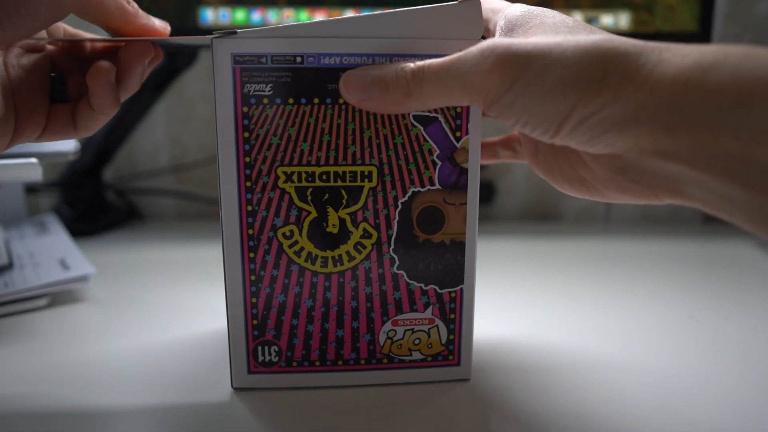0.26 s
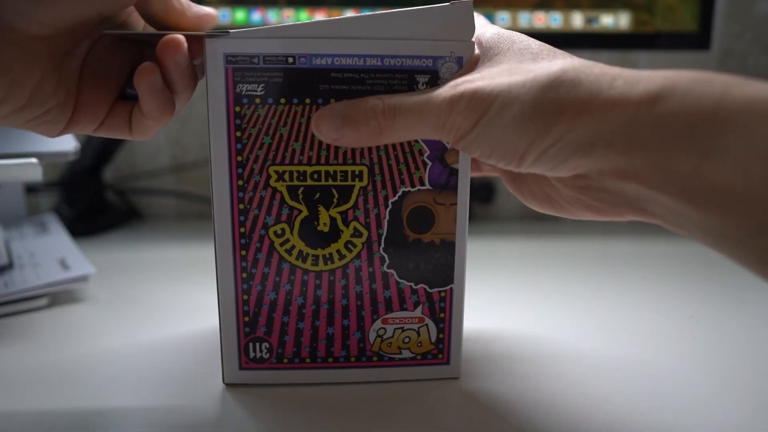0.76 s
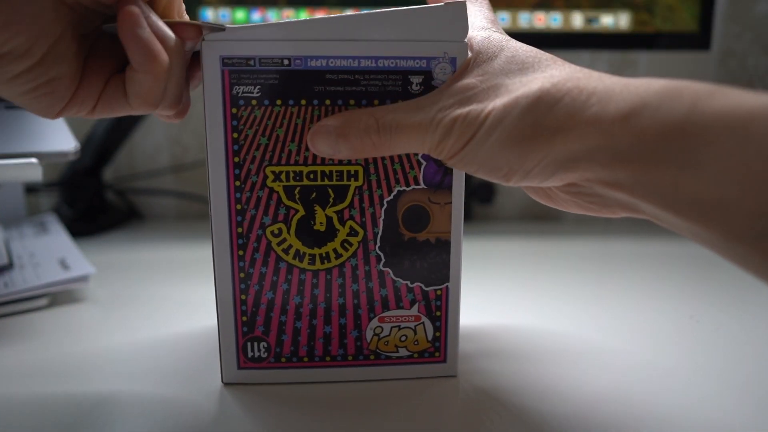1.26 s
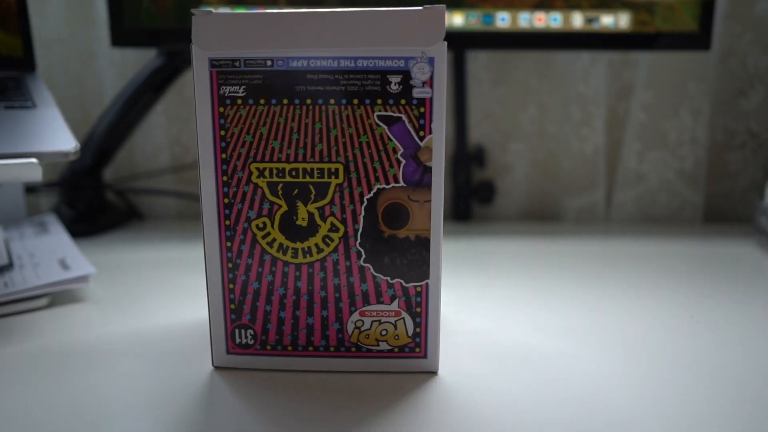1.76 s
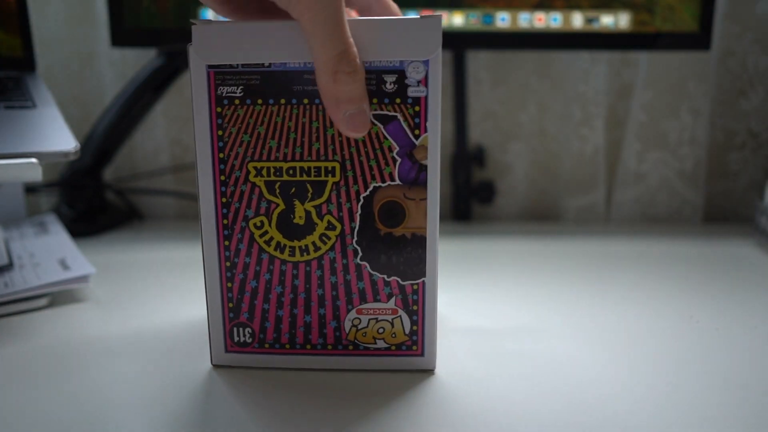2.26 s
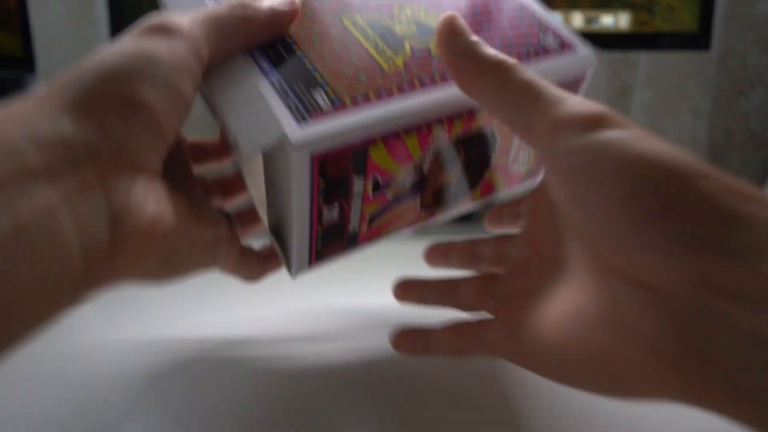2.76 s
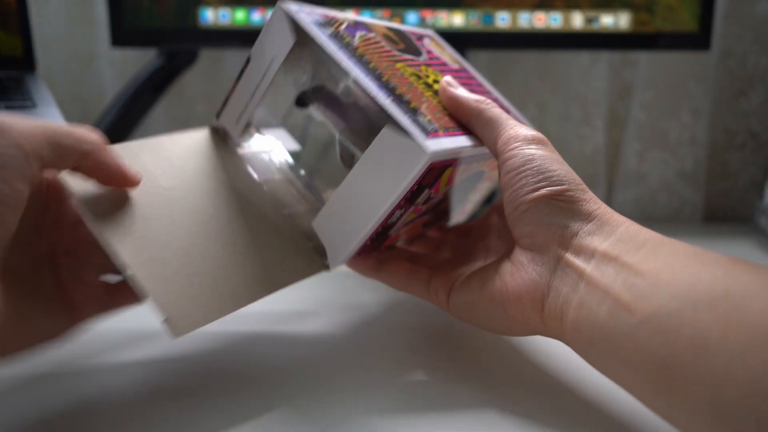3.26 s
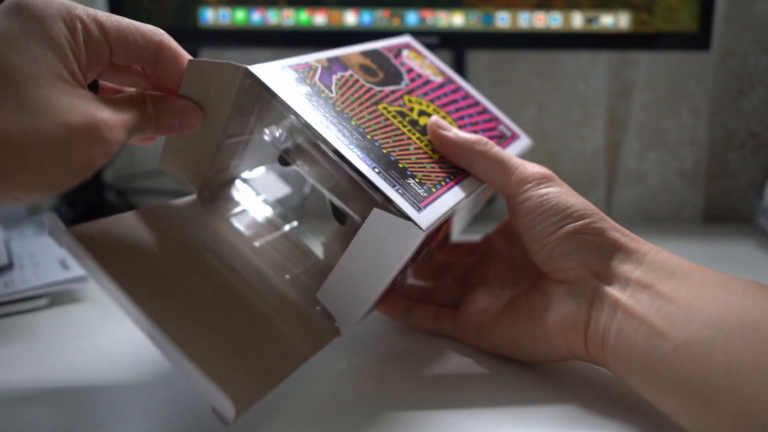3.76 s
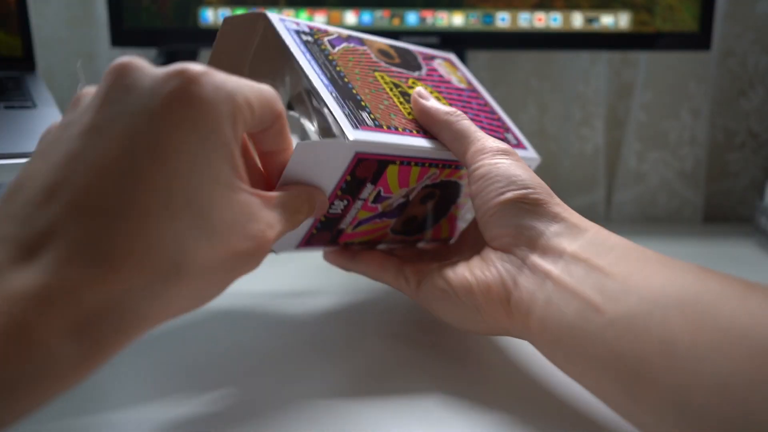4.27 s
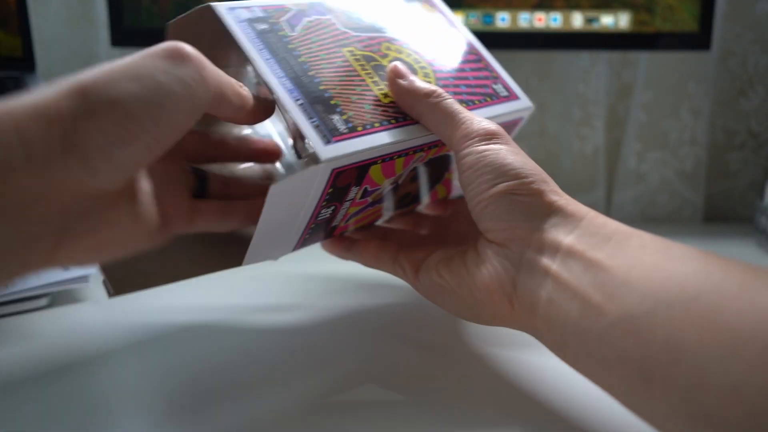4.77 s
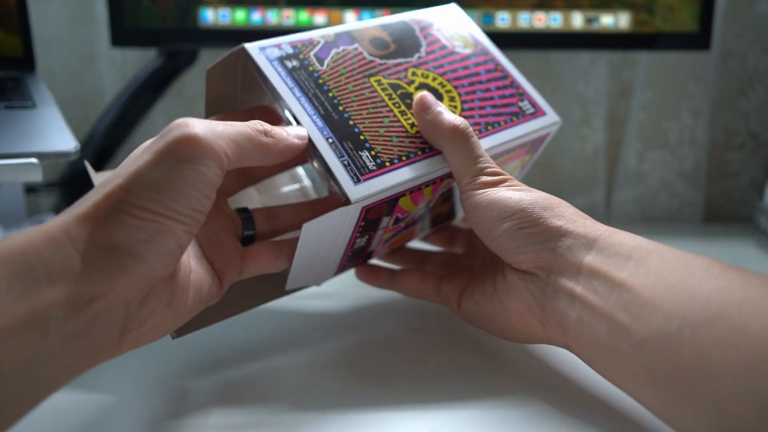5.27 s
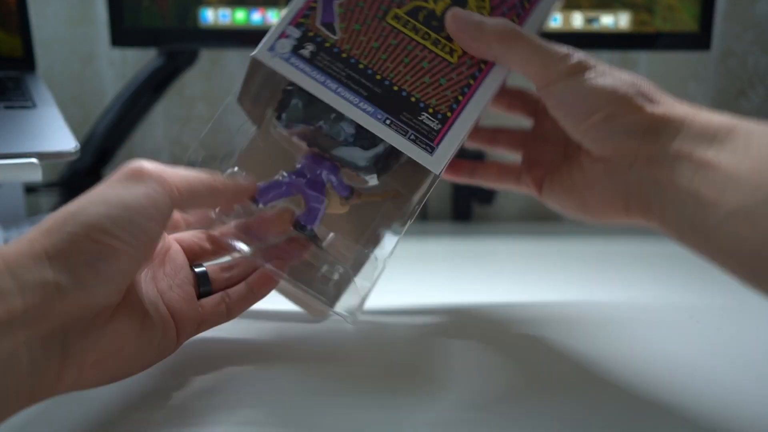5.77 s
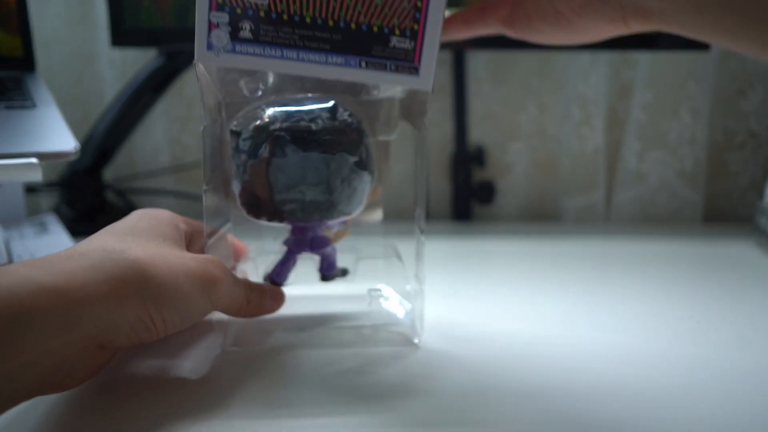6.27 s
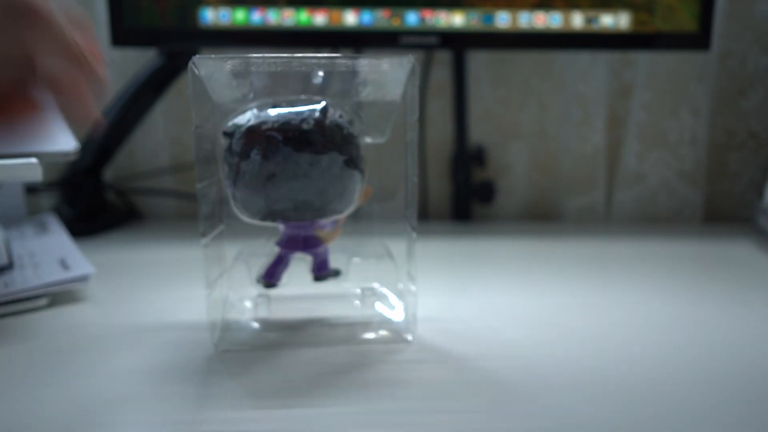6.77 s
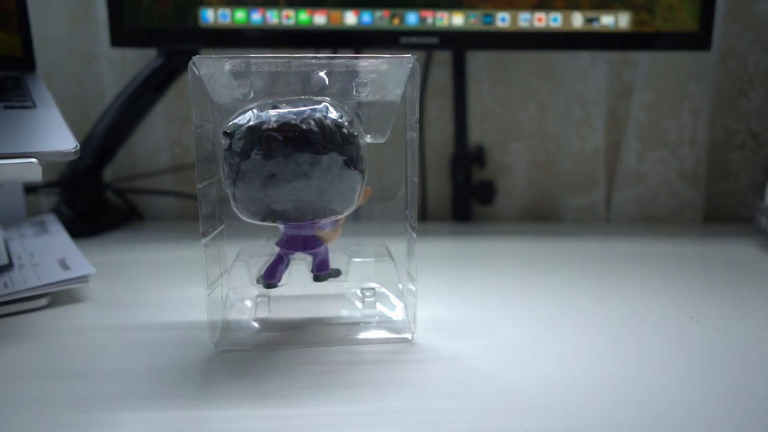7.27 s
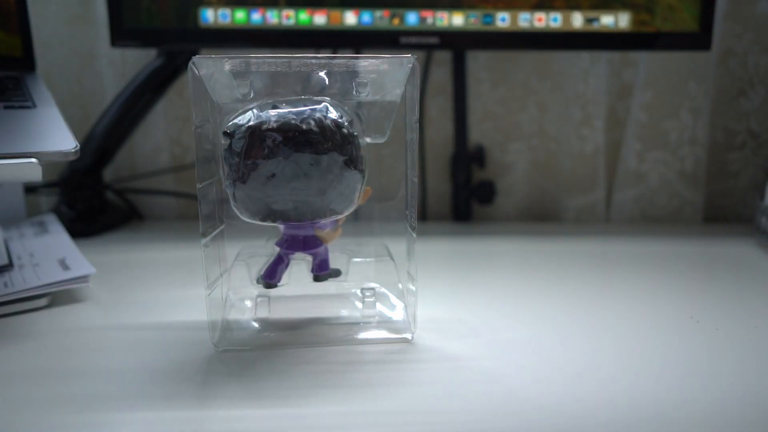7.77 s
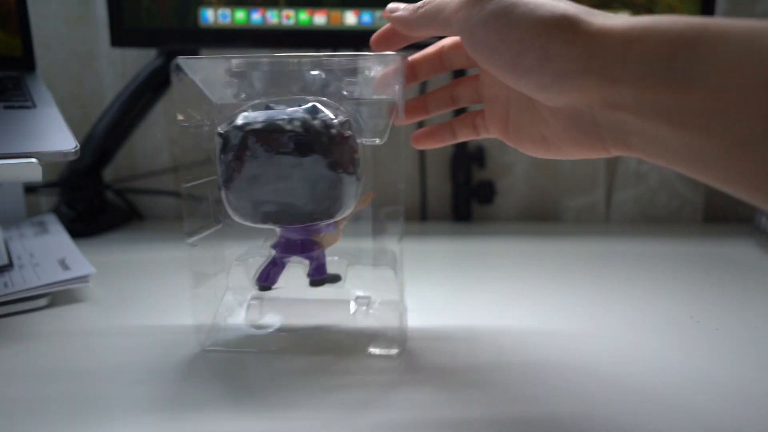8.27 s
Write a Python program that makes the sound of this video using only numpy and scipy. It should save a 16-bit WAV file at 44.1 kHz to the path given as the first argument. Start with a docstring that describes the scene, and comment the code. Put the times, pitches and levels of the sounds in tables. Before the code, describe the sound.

Close, fairly dry sound in a small room with faint low air, weighted to the left. From 0 to 1.3 s a standing cardboard box gets light hollow knocks with small ticks and faint rubbing, firmest near 0.8. At 1.3 the lid flap pops in a quick broad burst, with a short rub and a desk bump. From 1.8 to 5 s card is softly rubbed and folded, with dull buckling snaps, sharp flicks and crinkles, busier after 4.8. At 5.2 a rapid run of ticks starts the plastic insert moving; it scrapes out in uneven tugs until 6.5, with strong clicks near 5.3, 5.6 and 6.3. Soft bumps and a low rumble follow at 6.7, then delicate plastic rocking taps from 7.0 to 7.45. After a quiet pause, the empty box lands with a loud hollow knock at 7.9, a lesser one at 8.07, and the insert slides grainily to 8.5.

```python
"""Close microphone at a desk in a small room: a cardboard toy box stands there and is knocked, and a blade
pries at the lid until its flap pops open. Hands lift the box and fold back crinkling flaps that snap.
A thin plastic insert creeps in a run of ticks, scrapes out along the card in tugs, then rocks and taps.
The empty box is put down with a knock and the insert is slid over the desk.
Blows are struck modes with noisy cracks; rubbing is grainy noise shaped by card, plastic and desk."""
import sys
import numpy as np
from scipy import signal
from scipy.fft import rfft, irfft, next_fast_len
from scipy.io import wavfile
from scipy.ndimage import uniform_filter1d

SR = 44100
rng = np.random.default_rng(int(sys.argv[2]) if len(sys.argv) > 2 else 0)


def wrap_up_sound(samples):
    """Save the sound to the file named by the first command line argument, as 16-bit audio."""
    columns = np.atleast_2d(samples).T
    # keep every value between -1 and 1, then stretch to whole-number steps
    tamed = np.clip(columns, -1, 1)
    steps = np.round(tamed * 32767).astype(np.int16)
    wavfile.write(sys.argv[1], SR, steps)


N = 375291
TIME = np.arange(N) / SR       # s, whole scene
AGE = TIME[:SR // 3]           # s, since a blow

# Event levels are relative: each source's own trims, the room and the channel balance come on top.
# Bumps that reach the desk top: t/s, level/dB, tilt towards higher modes/(dB per octave)
DESK_BUMPS = [(1.318, -34, 6), (1.455, -25.5, 13), (1.848, -33, 2), (2.904, -31.5, -8), (3.053, -28, -10),
              (3.761, -33.5, 7), (4.699, -33.5, -4.5), (5.347, -27.5, 0), (6.656, -36, 3), (6.753, -27, -6),
              (7.121, -24, 0), (7.903, -17, 5), (8.069, -24, -3.5)]
# Desk rumble while things are put down: t/s, length/s, level/dB
DESK_RUMBLES = [(6.662, 0.14, -33.5), (6.853, 0.32, -48.5), (7.167, 0.39, -41.5)]
# Blows on the standing box: t/s, hollow body level/dB, hardness = tick over body/dB
BOX_KNOCKS = [(0.0603, -40.5, -7.5), (0.3442, -24, -12), (0.4879, -31.5, -38), (0.5287, -34.5, -12),
              (0.6695, -31.5, -18), (0.678, -26, -8.5), (0.778, -19.5, -14.5), (1.1127, -37, -13.5),
              (1.2821, -32, -21), (7.899, -12.5, -16), (8.0665, -25, -16)]
# Tuck flap springing free in quick jerks: t/s, level/dB
FLAP_JERKS = [(1.3142, -10), (1.3182, -10.5), (1.3247, -22)]
# Panel buckling under the fingers, a dull snap: t/s, panel level/dB, hardness = crack over panel/dB
PANEL_SNAPS = [(1.408, -34.5, 10), (1.4273, -34.5, 4), (1.603, -49, -0.5), (2.1911, -42.5, 14),
               (2.9015, -25.5, -15), (3.5614, -31.5, -9.5), (3.7004, -34, -0.5), (3.76, -40, 2),
               (3.85, -31, -16), (3.8676, -34, -25), (3.9328, -34, -10.5), (4.2744, -36, -4.5),
               (4.8229, -23, -3.5), (5.01, -25, -3), (5.1971, -21, -6.5), (5.2343, -16.5, -6),
               (6.2755, -14.5, -4), (6.3664, -25.5, -2), (6.6033, -46, 13.5), (6.6638, -30.5, 9),
               (6.784, -36, 3.5)]
# Edge catching and flicking free, a sharp click: t/s, panel level/dB, hardness = crack over panel/dB
EDGE_FLICKS = [(0.8921, -57, 15.5), (2.2653, -35, 0.5), (2.3384, -31, 5), (2.923, -39.5, 5),
               (3.0848, -36, 9), (3.1622, -30.5, -5.5), (4.114, -32.5, -3), (4.584, -42.5, -5.5),
               (4.807, -29.5, -4), (4.8174, -24.5, -5.5), (4.9653, -45.5, 9.5), (5.0544, -32.5, -1),
               (5.1466, -28.5, -9.5), (5.3426, -17.5, -25), (5.6326, -18.5, 1.5), (5.9608, -20.5, -1.5),
               (6.0133, -23.5, 0.5), (6.497, -23, 2.5), (6.7514, -40, 8.5), (6.7584, -31.5, 1)]
# Freed insert rocking on the desk: t/s, crack level/dB, ring level/dB
INSERT_TAPS = [(7.0117, -56, -41.5), (7.0624, -47, -36), (7.1186, -43.5, -37.5), (7.1787, -49, -41),
               (7.215, -31, -33), (7.2824, -43, -43), (7.3841, -45.5, -43.5), (7.443, -46, -41.5)]
# Quick slips that make the plastic shell sing: t/s, length/s, level/dB, treble tilt/(dB per octave)
SHELL_SLIPS = [(1.335, 0.036, -32.5, -15), (4.693, 0.024, -45.5, -1.5), (4.742, 0.023, -47.5, -0.5),
               (5.704, 0.015, -37.5, -24), (5.853, 0.04, -34.5, 4.5), (6.291, 0.079, -30.5, -3),
               (7.363, 0.018, -52.5, 3.5)]
# Blade, fingers and flaps rubbing on card: t/s, length/s, level/dB, brightness/dB
CARD_STROKES = [(0.53, 0.21, -49.5, 4), (0.862, 0.1, -54, -3), (1.31, 0.048, -25.5, 5.5),
                (1.43, 0.11, -39, 0.5), (1.82, 0.054, -53.5, 10), (1.954, 0.076, -64.5, 11),
                (2.192, 0.19, -46, 10.5), (2.476, 0.028, -45.5, -9.5), (2.556, 0.19, -46.5, -6),
                (2.79, 0.22, -42, 1), (3.03, 0.14, -40.5, -4.5), (3.223, 0.068, -40, 4.5),
                (3.537, 0.062, -45.5, -6), (3.652, 0.11, -45.5, 4), (3.82, 0.077, -45.5, 2),
                (4.1, 0.053, -44, -3.5), (4.17, 0.22, -53.5, -1.5), (4.444, 0.036, -64.5, 13.5),
                (4.792, 0.067, -34.5, -4), (4.85, 0.31, -48, -1.5), (6.52, 0.085, -36, -16),
                (6.65, 0.038, -28.5, -11), (6.76, 0.049, -35.5, -18)]
# Insert tugged out of the box: t/s, length/s, level/dB, brightness/dB
INSERT_TUGS = [(5.27, 0.078, -38.5, 0), (5.345, 0.11, -28.5, 6), (5.455, 0.21, -33.5, 1.5),
               (5.685, 0.088, -32, 5.5), (5.78, 0.17, -39, -8), (5.838, 0.02, -35.5, 10),
               (5.96, 0.232, -36, -4.5), (6.19, 0.16, -31.5, -3), (6.375, 0.15, -32, -1.5)]
# Insert pushed over the desk: t/s, length/s, level/dB, brightness/dB
DESK_PUSHES = [(8.035, 0.093, -41, -5.5), (8.13, 0.054, -45, -2.5), (8.23, 0.263, -38, 2.5)]

# Struck modes of the box on the desk, a loose panel, the desk top and the standing insert:
# f/Hz, level/dB, t60/s
BOX_RINGING = [(144, -12.5, 0.11), (201.2, -13.5, 0.099), (254, -11, .09), (292, -9.5, 0.08),
               (378, -11.5, 0.1), (478, 1.5, 0.067), (558.3, -1, 0.071), (680, -9.5, 0.031),
               (1040, -14.5, 0.02), (1390, -8, 0.023)]
PANEL_RINGING = [(273, -9, 0.067), (427, -3, 0.068), (581, 1, 0.084), (682, 1.5, 0.11), (840, -8.5, 0.019),
                 (1026, 0.5, 0.12), (1210, -2.5, 0.075)]
DESK_RINGING = [(64.6, -2.5, 0.48), (81.4, 1.5, 0.24), (123, 8, 0.15), (152, -6.5, 0.11),
                (182, -0.5, 0.086)]
INSERT_RINGING = [(684, 6.5, 0.042), (774, -3, 0.062), (1063, -8, 0.05), (1810, -3, 0.014)]
# Resonances of the plastic shell and of the insert's creeping rim: f/Hz, width/Hz, level/dB
SHELL_PEAKS = [(1060, 140, -2.5), (2240, 91, -14), (3420, 780, -8), (3820, 270, -5.5)]
RIM_PEAKS = [(7100, 500, -3), (8220, 700, 7), (9940, 820, 6)]

# Spectra of rubbed card, plastic along card, insert over desk, flap burst, low thumps and room air:
# f/Hz, level per Hz/dB
CARD_SPECTRUM = [(35, -23), (60, 5), (94, 1.5), (323, -10), (566, -3), (1860, -16.5), (3760, -19),
                 (5460, -40), (11000, -41.5), (16000, -54)]
PLASTIC_SPECTRUM = [(35, -18.5), (60, 1), (323, -8), (553, -4.5), (903, -11.5), (1010, -5), (1910, -13.5),
                    (3580, -11.5), (4750, -18), (16000, -26)]
DESK_SPECTRUM = [(59, -50), (100, -12), (156, -22), (215, -5.5), (513, -12), (662, 1), (950, -5.5),
                 (1080, -6), (3470, -13.5), (16000, -24)]
FLAP_SPECTRUM = [(50, -14), (150, -10.5), (310, -1.5), (560, -1), (800, -8.5), (1500, -8), (1900, -19.5),
                 (2500, -6), (3800, -10.5), (5800, -23), (9800, -24.5), (16000, -36.5)]
LOW_SPECTRUM = [(35, -13), (70, 1.5), (100, -1), (140, -6), (210, -10.5), (350, -12.5), (900, -58)]
AIR_SPECTRUM = [(25, -30.5), (42, 8), (139, -6.5), (258, 0), (435, -7), (544, -7), (1840, -23), (3880, -26),
                (5230, -37.5), (14800, -43.5), (16000, -48)]
# Bands of panel, rasp and edge sparkle: lower f/Hz, upper f/Hz
ZONES = [(50, 1400), (1400, 4600), (4600, 17000)]

ROOM_T60_S, ROOM_DB = 0.27, -10   # decay; tail against direct sound
LEFT_OVER_RIGHT_DB = 9.0
CRINKLES_PER_S, CRINKLE_DB, CRINKLE_SPREAD_DB = 36, -3.5, 2.5   # mean rate, level against rubbing, sizes
RIM_DAMPING_DB = 13               # once the insert slides, the card damps its rim


def from_db(db):
    """Decibels to gain."""
    return 10 ** (np.asarray(db) / 20)


def rms_one(x):
    """Scale to rms 1."""
    return x / np.sqrt(np.mean(x ** 2) + 1e-20)


def crest_one(x, size=176):
    """Scale so that the loudest few milliseconds have rms 1."""
    power = uniform_filter1d(x ** 2, size, mode="constant")
    return x / np.sqrt(power.max() + 1e-20)


def band(x, edges_hz, order=3):
    """Causal band-pass."""
    sos = signal.butter(order, edges_hz, "band", fs=SR, output="sos")
    return signal.sosfilt(sos, x + 1e-18)


def colour(x, spectrum, peaks=()):
    """Shape noise by a spectrum, with resonances standing out of it."""
    size = next_fast_len(len(x))
    hz = np.arange(size // 2 + 1) * SR / size + 1e-3
    points, db = np.transpose(spectrum)
    lift = 1 + sum(from_db(d) / (1 + (2 * (hz - f) / width) ** 2) for f, width, d in peaks)
    shape = from_db(np.interp(np.log(hz), np.log(points), db))
    return irfft(rfft(x, size) * lift * shape, size)[:len(x)]


def drift(per_s):
    """Random wander with rms 1: straight lines between chance values."""
    knots = rng.standard_normal(4000)
    return rms_one(np.interp(TIME * per_s, np.arange(len(knots)), knots))


def add(track, s, sound):
    """Mix a sound in at a time."""
    start = int(round(s * SR))
    track[start:start + len(sound)] += sound[:N - start]


def dying(t60):
    """Exponential decay by 60 dB in t60 seconds."""
    return from_db(-60 * AGE / t60)


def swell(length, rise_s, fall_s, grow_db=0):
    """One stroke takes hold, lasts while the hand gathers speed, and lets go."""
    age = TIME[:SR]
    speed = from_db(grow_db * (np.minimum(age / length, 1) - 0.5))
    hold = np.clip(age / rise_s, 0, 1)
    release = np.exp(-np.maximum(age - length, 0) / fall_s)
    return speed * hold * release


def shifting(x, gap_s, share, wander, per_s=11):
    """Sound bounces between walls whose gap keeps changing, so its resonances wander."""
    out = x
    round_trip = gap_s * np.exp(wander * drift(per_s))
    for trips in (1, 2, 3):
        source = np.round((TIME - trips * round_trip) * SR).astype(int)
        out = out + (-share) ** trips * x[np.clip(source, 0, N - 1)]
    return out / np.sqrt(1 + share ** 2 + share ** 4)


def ring(modes, scatter_db, detune):
    """Struck modes; strength and pitch depend on where the thing is hit and held."""
    out = 0
    for hz, db, t60 in modes:
        strength, shift, sign = rng.standard_normal(3)
        gain = np.sign(sign) * from_db(db + scatter_db * strength)
        tone = np.sin(2 * np.pi * hz * (1 + detune * shift) * AGE)
        out = out + gain * dying(t60) * tone
    return out


def thud(modes, t60, share_db, detune):
    """A blow to a panel: a few clear modes among many damped ones."""
    clear = crest_one(ring(modes, scatter_db=-1.0, detune=detune))
    strike = rng.standard_normal(len(AGE)) * dying(t60) + 6 * (AGE == 0)
    damped = band(strike, [130, 1100], order=2)
    return crest_one(clear + from_db(share_db) * crest_one(damped))


def crack(t60, spike, fold_db=6, rise_s=0.0012):
    """A sharp release with the crowded high modes of a thin sheet; each fold has its own resonances."""
    folds = [(hz, hz / 7, fold_db) for hz in 1600 * 2 ** rng.uniform(0, 2.99, size=3)]
    spectrum = [(1400, 15), (10000, 4), (16000, -5.0)]
    sheet = rms_one(colour(rng.standard_normal(len(AGE)), spectrum, folds)) * dying(t60)
    release = spike * (np.arange(len(AGE)) == int(rise_s * SR))
    return sheet * np.clip(AGE / rise_s, 0, 1) + release


def split_crack(tick, edge_db, order=3):
    """A crack's rasp band at unit level with its share of top-end sparkle."""
    rasp = crest_one(band(tick, ZONES[1], order=order))
    return rasp + from_db(edge_db) * crest_one(band(tick, ZONES[2]))


def room_air():
    """Steady, mostly low background noise of the room."""
    return from_db(-56) * rms_one(colour(rng.standard_normal(N), AIR_SPECTRUM))


def room(x, first_echo_s=0.0068, wall_hz=6500):
    """A dense, slightly dull tail from the nearby walls."""
    noise = band(rng.standard_normal(len(AGE)), [120, min(wall_hz, 18000)], order=1)
    tail = noise * dying(ROOM_T60_S) * (AGE > first_echo_s)
    tail = tail / np.sqrt(np.sum(tail ** 2) * SR / (2 * wall_hz))
    return x + from_db(ROOM_DB) * signal.fftconvolve(x, tail)[:N]


def desk(bump_db=-3, rumble_db=0):
    """The desk top booms in its modes under bumps and rumbles around its two lowest ones."""
    shaking = np.zeros(N)
    for s, length, db in DESK_RUMBLES:
        add(shaking, s, from_db(db + rumble_db) * swell(length, rise_s=0.044, fall_s=0.047))
    low_peaks = [(67.4, 2.3, 13), (84.3, 4.4, 5.3)]   # f/Hz, width/Hz, level/dB
    out = shaking * rms_one(colour(rng.standard_normal(N), LOW_SPECTRUM, low_peaks))
    for s, db, tilt_db in DESK_BUMPS:
        modes = [(hz, level + tilt_db * np.log2(hz), t60) for hz, level, t60 in DESK_RINGING]
        boom = crest_one(ring(modes, scatter_db=2.5, detune=0.012))
        add(out, s, from_db(db + bump_db) * boom)
    return out


def grip(panel_level, level_db=-11, uneven_db=1.5):
    """Fingers shifting their grip thump dully and unevenly wherever the card is rubbed."""
    noise = colour(rng.standard_normal(N), LOW_SPECTRUM)
    thumps = rms_one(band(noise, [55, 300], order=2))
    return from_db(level_db + uneven_db * drift(25)) * panel_level * thumps


def box_modes(blow_db, light_db=-23, flex=0.48):
    """A heavy blow flexes the whole box and brings out the modes under its hollow note."""
    heavy_db = flex * max(blow_db - light_db, 0)
    return [(hz, db + heavy_db * (hz < 450), t60) for hz, db, t60 in BOX_RINGING]


def knocks(body_db=-1, crack_db=-3, tick_lag_s=0.0033):
    """The box answers each blow with a hollow note and, just after, a small tick."""
    out = np.zeros(N)
    for s, db, hard_db in BOX_KNOCKS:
        body = thud(box_modes(db), t60=0.064, share_db=-9.5, detune=0.025)
        tick = split_crack(crack(t60=0.017, spike=4.1), edge_db=-9, order=5)
        add(out, s, from_db(db + body_db) * body)
        add(out, s + tick_lag_s, from_db(db + hard_db + crack_db) * tick)
    return out


def flap_pop(box_db=-4):
    """Each jerk of the flap is a broad burst that also rings the box."""
    out = np.zeros(N)
    for s, db in FLAP_JERKS:
        burst = crest_one(colour(rng.standard_normal(len(AGE)), FLAP_SPECTRUM) * dying(0.038))
        note = crest_one(ring(box_modes(db), scatter_db=1.5, detune=0.01))
        add(out, s, from_db(db) * (burst + from_db(box_db) * note))
    return out


def snaps(rows, panel_db, crack_db, edge_db, crack_t60):
    """A sheet buckles or flicks free with a crack and its panel rings briefly."""
    out = np.zeros(N)
    for s, db, hard_db in rows:
        panel = thud(PANEL_RINGING, t60=0.031, share_db=2.0, detune=0.0867)
        click = split_crack(crack(t60=crack_t60, spike=3), edge_db)
        add(out, s, from_db(db + panel_db) * panel)
        add(out, s, from_db(db + hard_db + crack_db) * click)
    return out


def taps(ring_db=-1, crack_db=-2, edge_db=-15):
    """The rocking insert touches the desk lightly: its modes ring under a dull crack."""
    out = np.zeros(N)
    for s, crack_level, ring_level in INSERT_TAPS:
        note = crest_one(ring(INSERT_RINGING, scatter_db=9, detune=0.059))
        click = split_crack(crack(t60=0.037, spike=3), edge_db)
        add(out, s, from_db(ring_level + ring_db) * note)
        add(out, s, from_db(crack_level + crack_db) * click)
    return out


def slips(peak_lift_db=10):
    """Smooth plastic lets go for a moment and sings between the grip and its edge."""
    out = np.zeros(N)
    peaks = [(hz, width, db + peak_lift_db) for hz, width, db in SHELL_PEAKS]
    for s, length, db, tilt_db in SHELL_SLIPS:
        spectrum = [(900, -28.5), (2100, 12.5), (4100, 2.5),
                    (5500, tilt_db + 2.5), (9000, 2 * tilt_db - 0.5), (16000, 2 * tilt_db - 10.5)]
        hiss = rms_one(colour(rng.standard_normal(SR), spectrum, peaks))
        add(out, s, from_db(db) * hiss * swell(length, rise_s=0.0065, fall_s=0.0038))
    return shifting(out, gap_s=0.00062, share=0.52, wander=0.11)


def creep(start_s=5.21, length_s=0.049, jerks_per_s=90, level_db=-36, unevenness=0.14, t60=0.022):
    """The wedged insert sticks and slips in a quick run of ticks that ring its rim."""
    out = np.zeros(N)
    spectrum = [(1500, 5.5), (4000, 6.5), (16000, -10)]
    for k in range(int(length_s * jerks_per_s)):
        tick = colour(rng.standard_normal(len(AGE)), spectrum, RIM_PEAKS) * dying(t60)
        s = start_s + (k + unevenness * rng.standard_normal()) / jerks_per_s
        add(out, s, from_db(level_db) * crest_one(tick))
    return out


def crinkles(softer_db=0, t60=0.014, spike=6):
    """Small creases give way at uneven intervals while a sheet is handled."""
    out = np.zeros(N)
    for k in range(int(CRINKLES_PER_S * N / SR)):
        burst = rng.standard_normal(len(AGE)) * dying(t60) + spike * (AGE == 0)
        size_db = CRINKLE_SPREAD_DB * min(rng.exponential(), 2)
        add(out, (k + rng.random()) / CRINKLES_PER_S, from_db(size_db) * burst)
    return from_db(CRINKLE_DB - softer_db) * rms_one(out)


def friction(per_s, size_db, smooth, judder_db):
    """Fibres catch and let go: tiny clicks of uneven size on a hiss, under a juddering pressure."""
    sizes = from_db(size_db * np.minimum(rng.exponential(1, N), 4)) * rng.choice([-1, 1], N)
    clicks = rms_one(sizes * (rng.random(N) < per_s / SR))
    hiss = smooth * rng.standard_normal(N)
    return (clicks + hiss) * from_db(judder_db * drift(170))


def stroke_levels(rows, rise_s, fall_s, grow_db, rasp_share):
    """Panel, rasp and edge gains: brightness lifts the edge fully, the rasp in part; powers add up."""
    power = np.zeros((3, N))
    for s, length, db, bright_db in rows:
        stroke = swell(length, rise_s, fall_s, grow_db)
        for track, share in zip(power, (0, rasp_share, 1)):
            add(track, s, (from_db(db + share * bright_db) * stroke) ** 2)
    return np.sqrt(power)


def rub(grain, levels, spectrum, trim_db, peaks=()):
    """Friction shakes the panel, rasps in the sheet and hisses at the edge."""
    sound = colour(grain, spectrum, peaks)
    out = 0
    for level, db, zone in zip(levels, trim_db, ZONES):
        out = out + level * from_db(db) * rms_one(band(sound, zone, order=4))
    return out


def desk_glide():
    """The insert slides over the desk: dense fine friction, louder as each push gathers speed."""
    levels = stroke_levels(DESK_PUSHES, rise_s=0.025, fall_s=0.017, grow_db=9, rasp_share=0.56)
    drag = friction(per_s=5200, size_db=8.5, smooth=2.5, judder_db=0.0)
    drag = shifting(drag, gap_s=0.00087, share=0.14, wander=0.29)
    grain = rms_one(drag) + crinkles(softer_db=3)
    return rub(grain, levels, DESK_SPECTRUM, trim_db=[0.3, -1.5, -14])


def insert_scrape():
    """The tugged insert scrapes along card; friction excites its shell and damped rim."""
    levels = stroke_levels(INSERT_TUGS, rise_s=0.014, fall_s=0.0079, grow_db=0, rasp_share=0.08)
    scrape = friction(per_s=2200, size_db=0.0, smooth=1.0, judder_db=1.5)
    scrape = shifting(scrape, gap_s=0.000907, share=0.5, wander=0.3, per_s=22)
    grain = rms_one(scrape) + crinkles(softer_db=5.5)
    damped_rim = [(hz, width, db - RIM_DAMPING_DB) for hz, width, db in RIM_PEAKS]
    return rub(grain, levels, PLASTIC_SPECTRUM, trim_db=[0.3, 0.3, -5], peaks=SHELL_PEAKS + damped_rim)


def card_rubbing(levels):
    """Blade, fingers and flaps rub on card: coarse juddering friction with crinkling creases."""
    creases = friction(per_s=1200, size_db=4.5, smooth=0.8, judder_db=3.0)
    creases = shifting(creases, gap_s=0.0011, share=0.7, wander=0.3)
    grain = rms_one(creases) + crinkles()
    return rub(grain, levels, CARD_SPECTRUM, trim_db=[0.4, -10, -13.5])


def scene():
    """All sources reach one close microphone, stronger in the left channel."""
    strokes = stroke_levels(CARD_STROKES, rise_s=0.019, fall_s=0.015, grow_db=1.5, rasp_share=0.58)
    without_room = room_air() + desk() + grip(strokes[0])
    buckling = snaps(PANEL_SNAPS, panel_db=-2.5, crack_db=-3, edge_db=-15.5, crack_t60=0.035)
    flicking = snaps(EDGE_FLICKS, panel_db=-1.5, crack_db=-2, edge_db=-5, crack_t60=0.029)
    blows = knocks() + flap_pop() + buckling + flicking + taps()
    squeaks = slips() + creep()
    rubbing = desk_glide() + insert_scrape() + card_rubbing(strokes)
    mono = room(blows + squeaks + rubbing) + without_room
    sides = from_db([[LEFT_OVER_RIGHT_DB], [0]])
    return mono * sides / sides.mean()


def record(dry):
    """Peaks beyond full scale are clipped, then a steep low-pass cuts the top."""
    low_pass = signal.ellip(12, 0.1, 100, 15900, fs=SR, output="sos")   # cutoff f/Hz = 15900
    return signal.sosfilt(low_pass, np.clip(dry, -1, 1))


dry = scene()
out = record(dry)
wrap_up_sound(out)
```